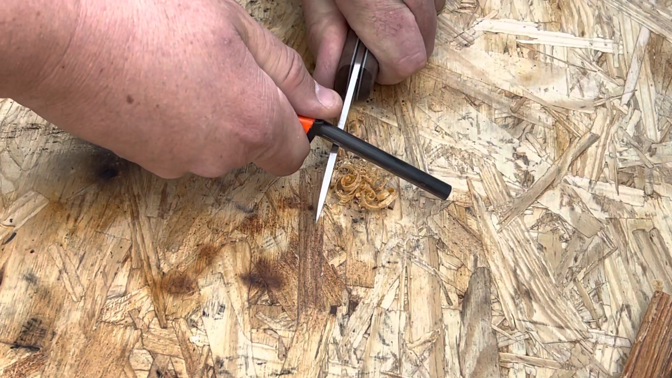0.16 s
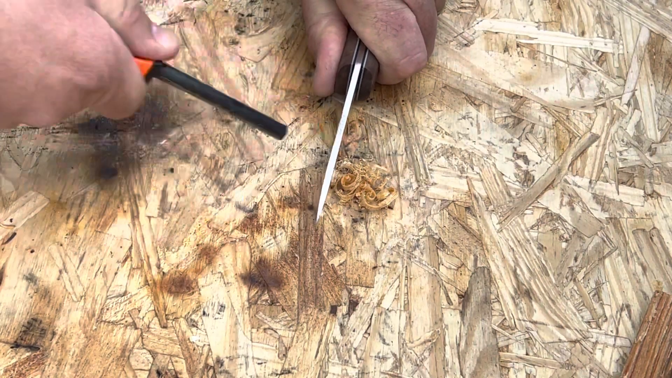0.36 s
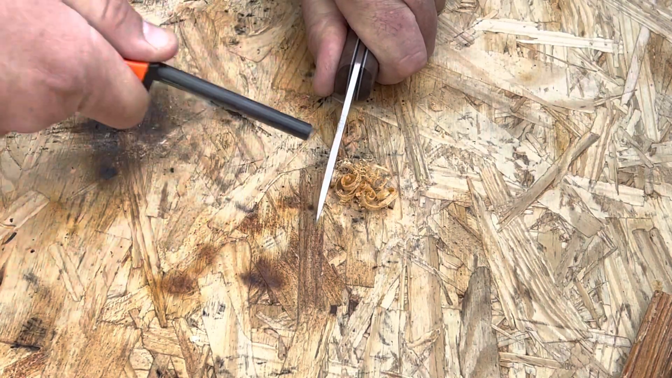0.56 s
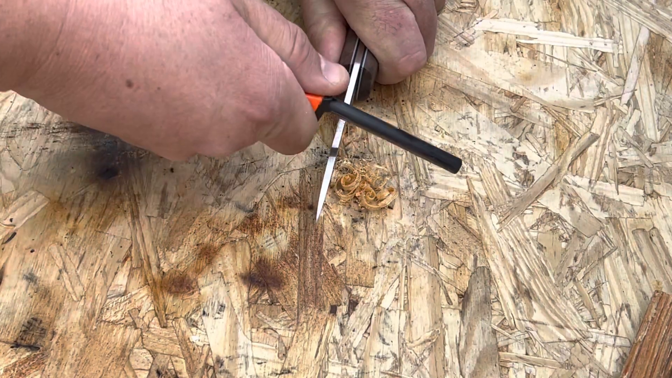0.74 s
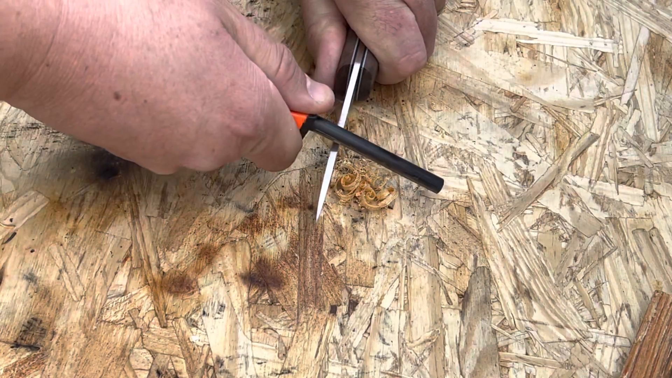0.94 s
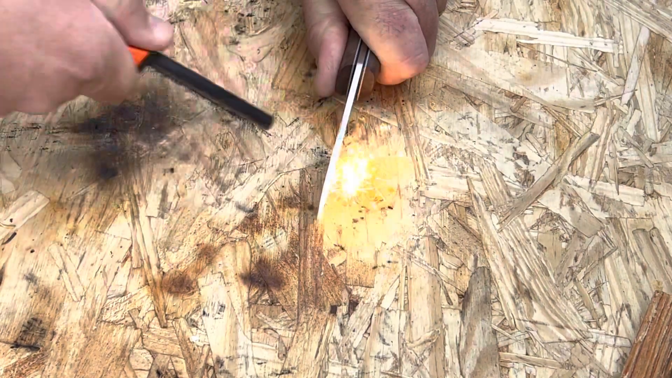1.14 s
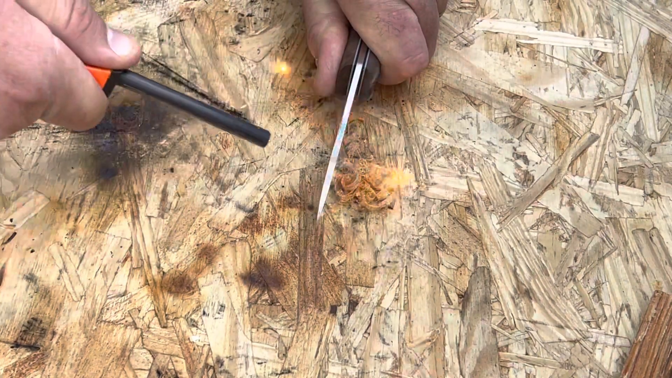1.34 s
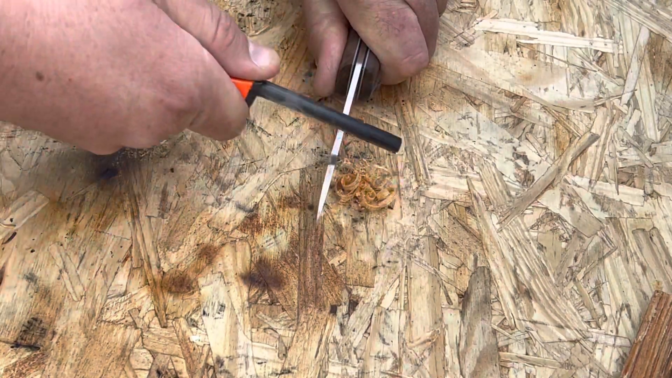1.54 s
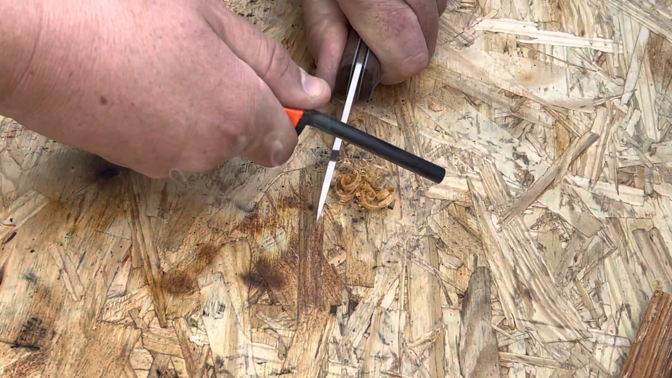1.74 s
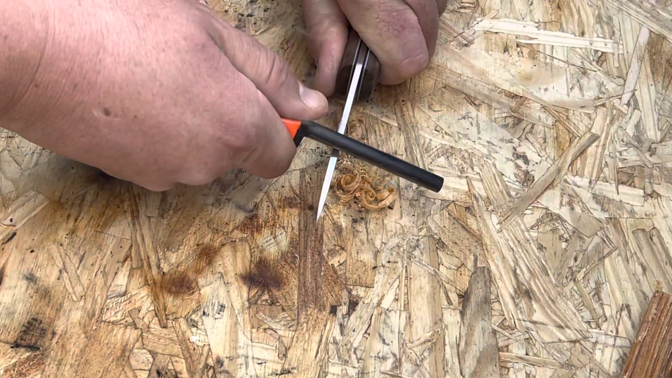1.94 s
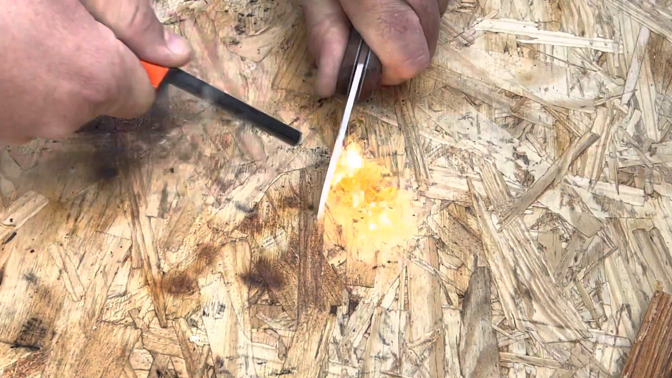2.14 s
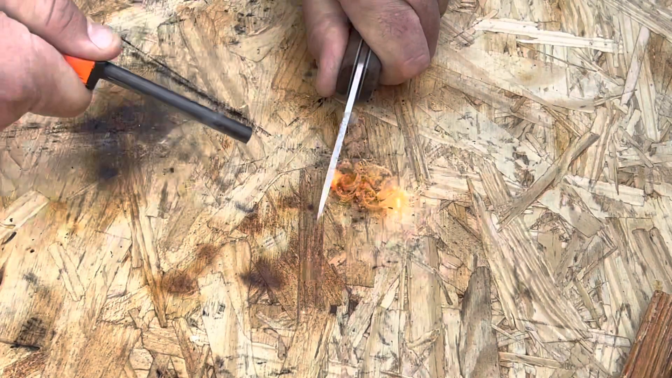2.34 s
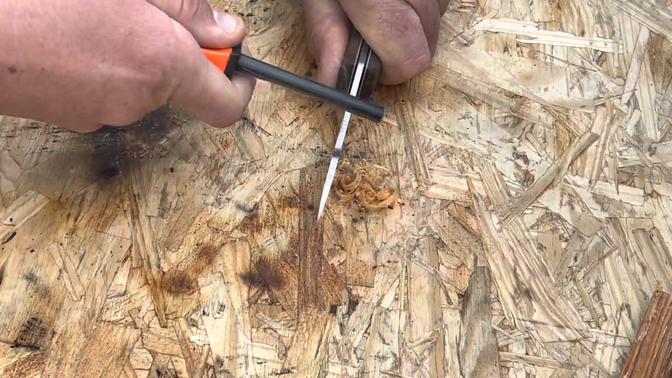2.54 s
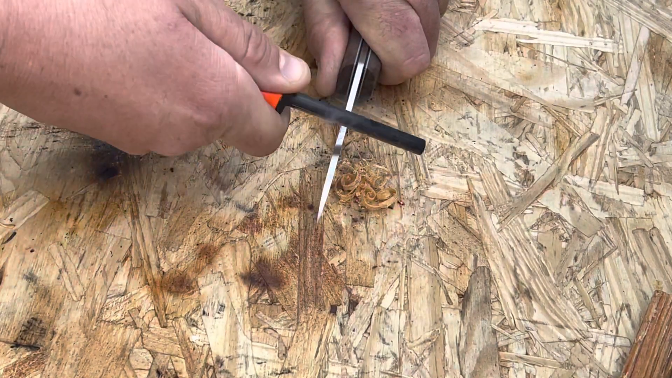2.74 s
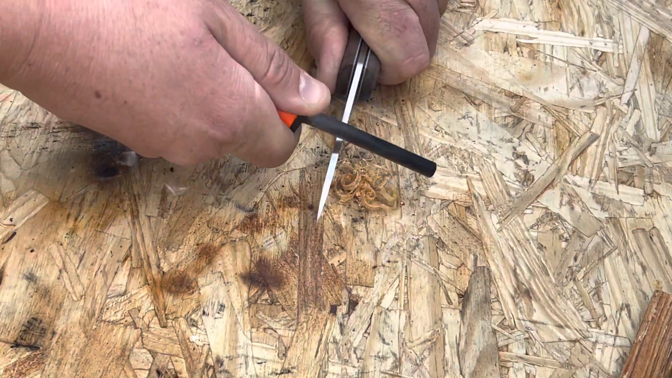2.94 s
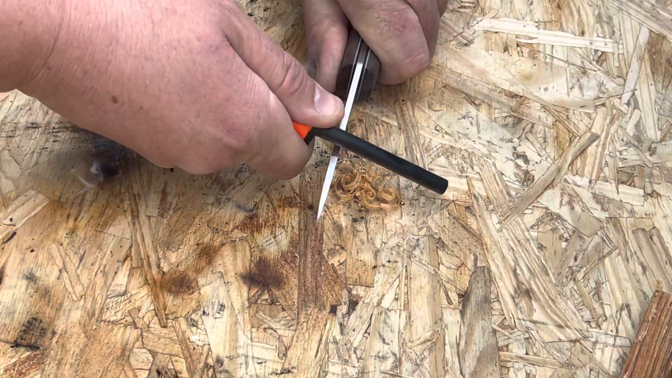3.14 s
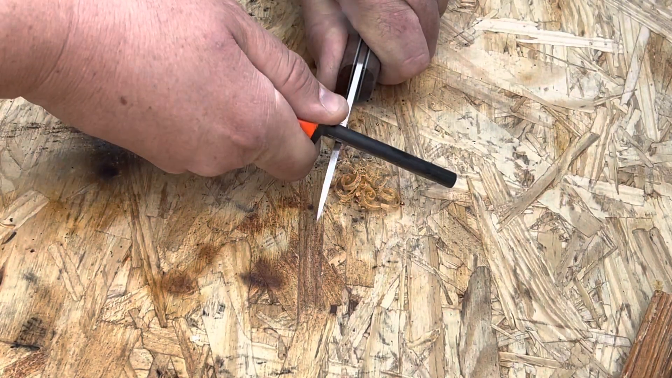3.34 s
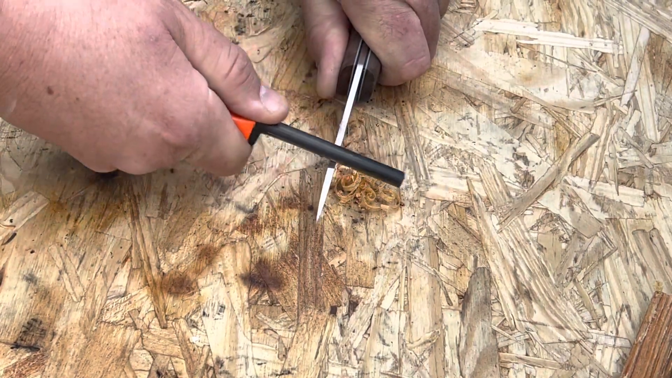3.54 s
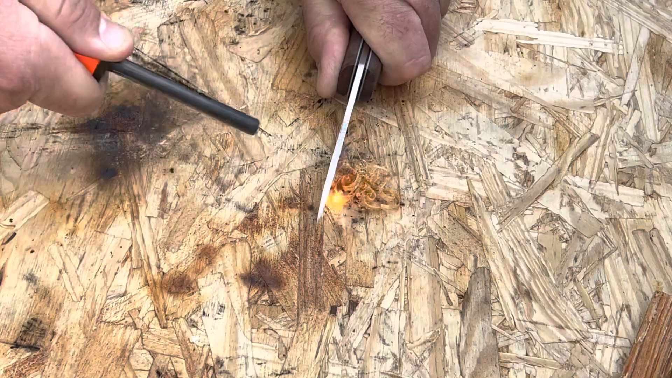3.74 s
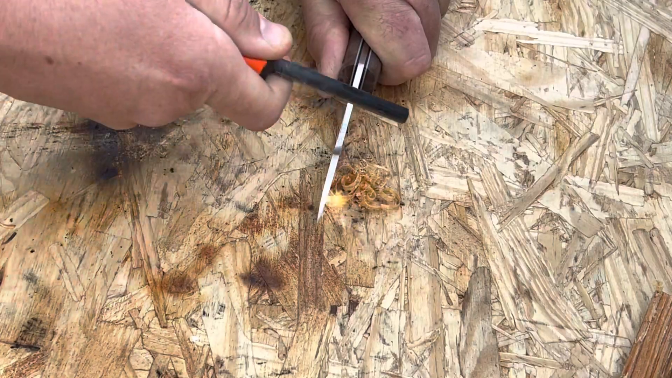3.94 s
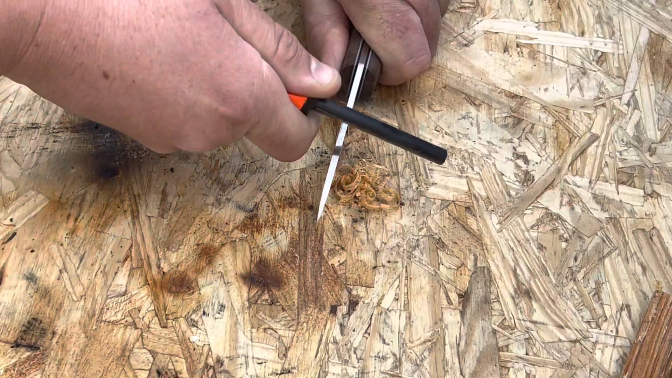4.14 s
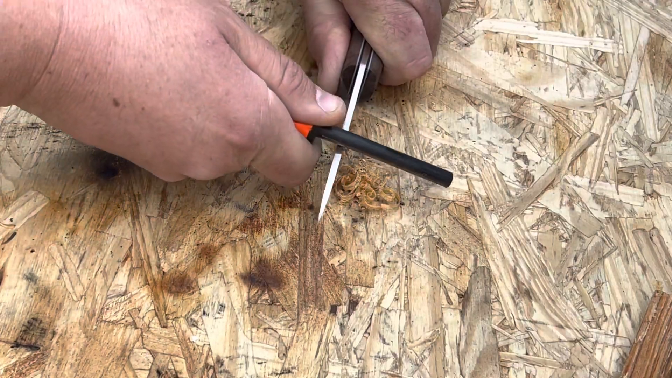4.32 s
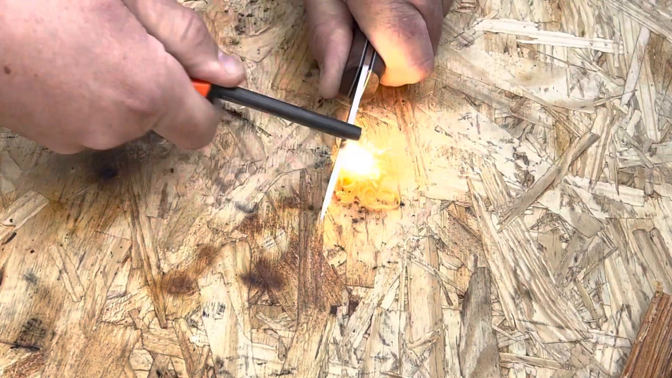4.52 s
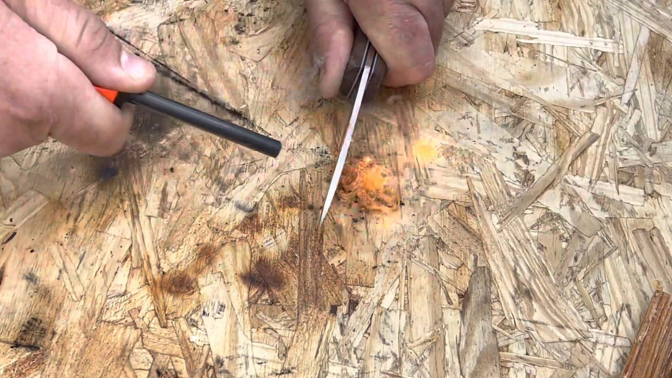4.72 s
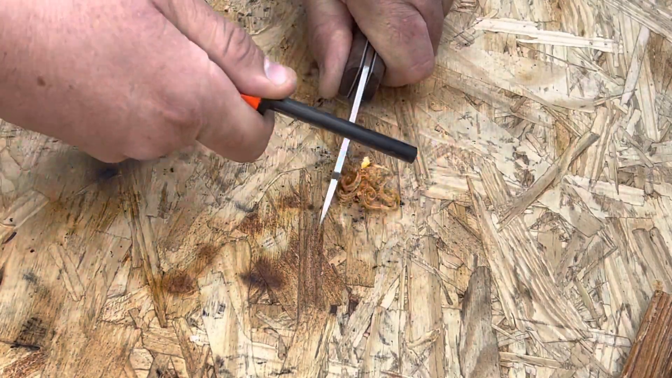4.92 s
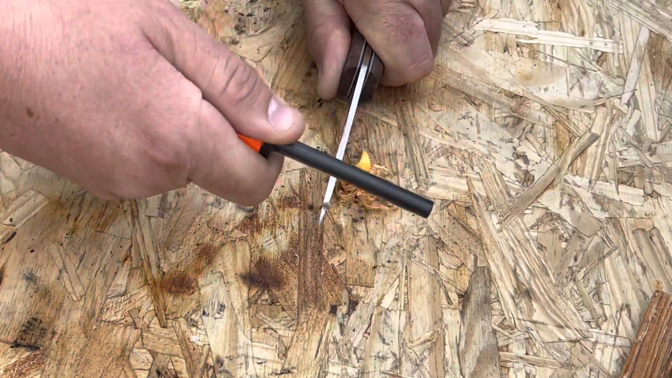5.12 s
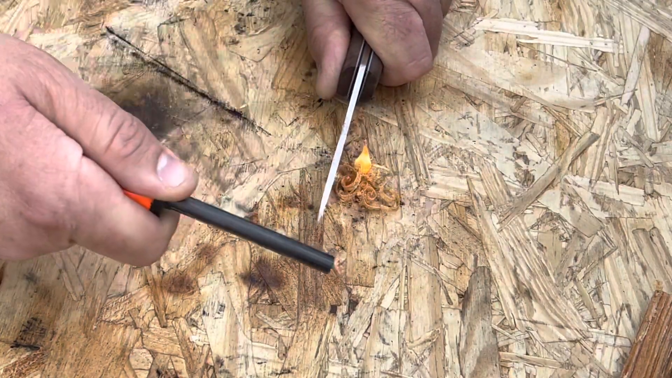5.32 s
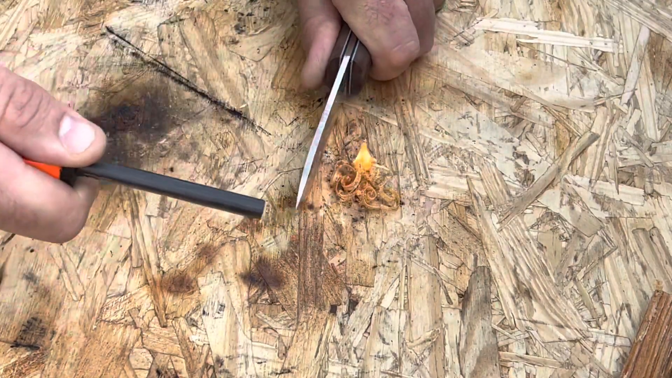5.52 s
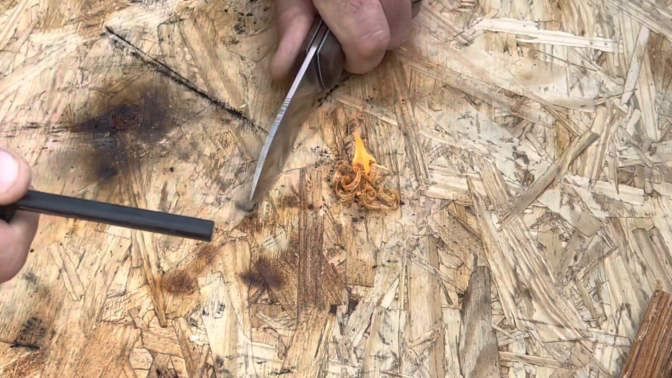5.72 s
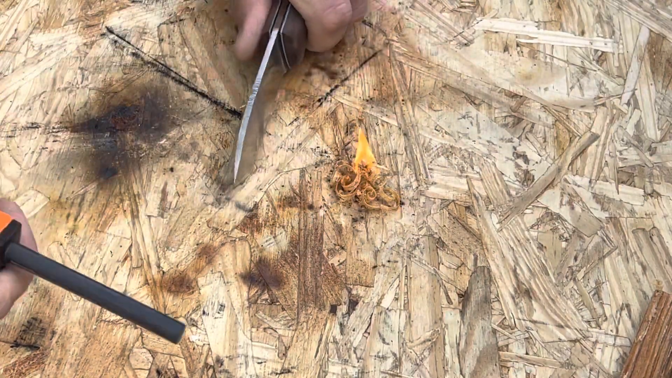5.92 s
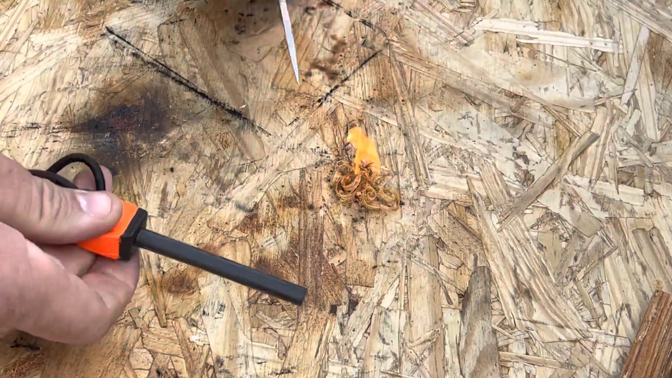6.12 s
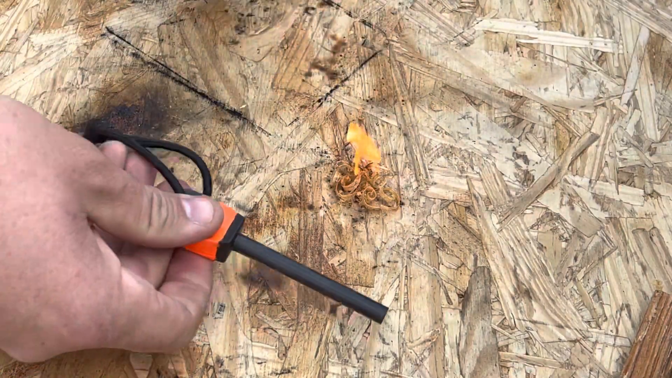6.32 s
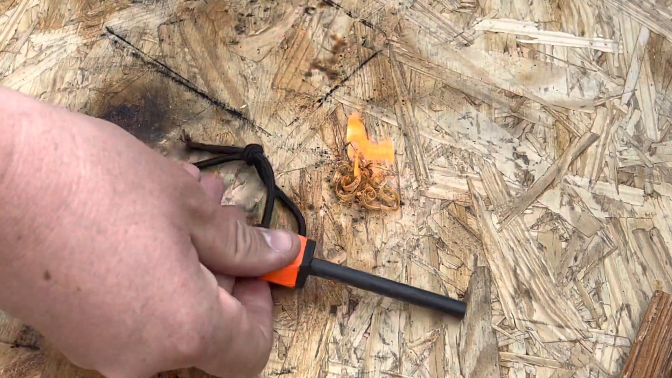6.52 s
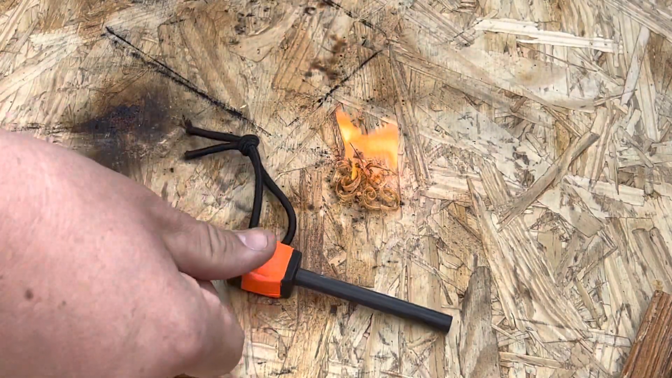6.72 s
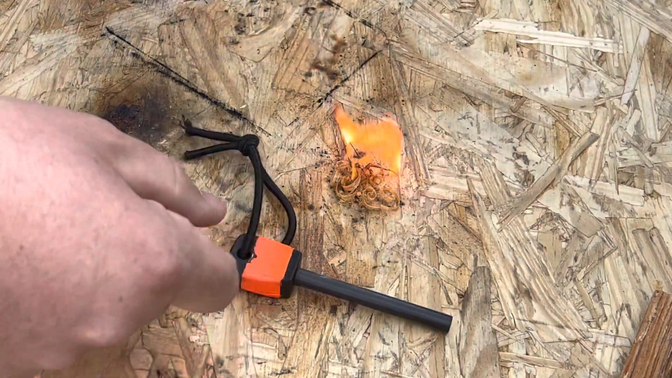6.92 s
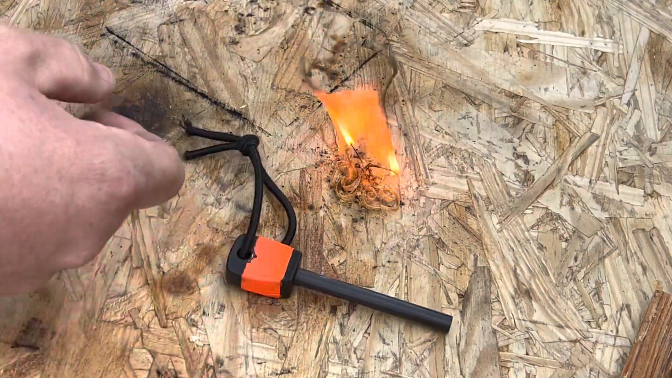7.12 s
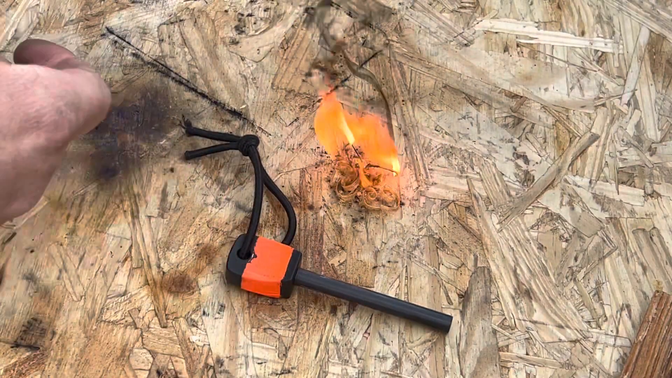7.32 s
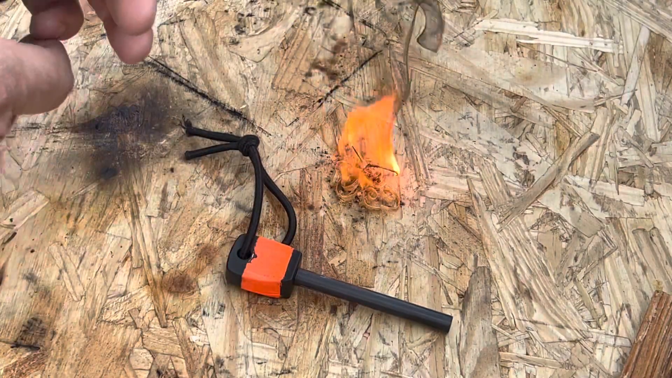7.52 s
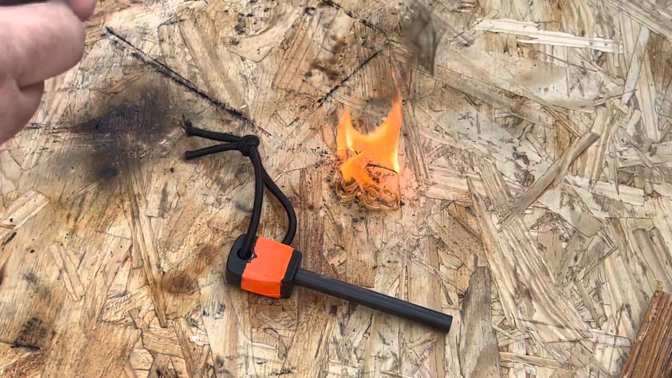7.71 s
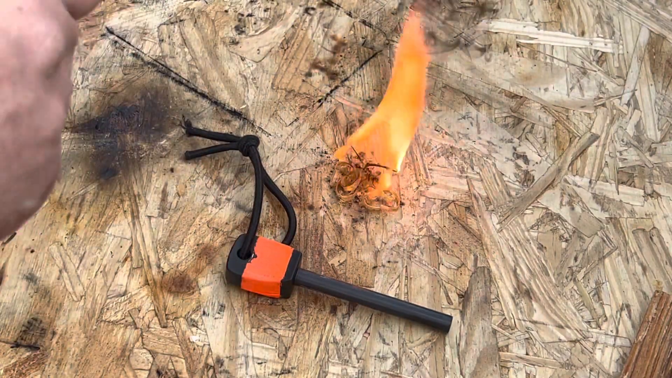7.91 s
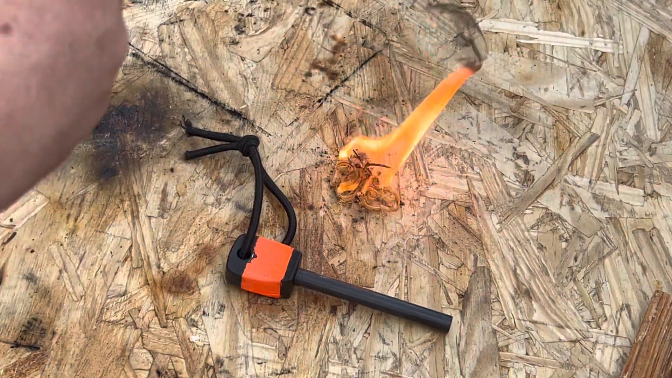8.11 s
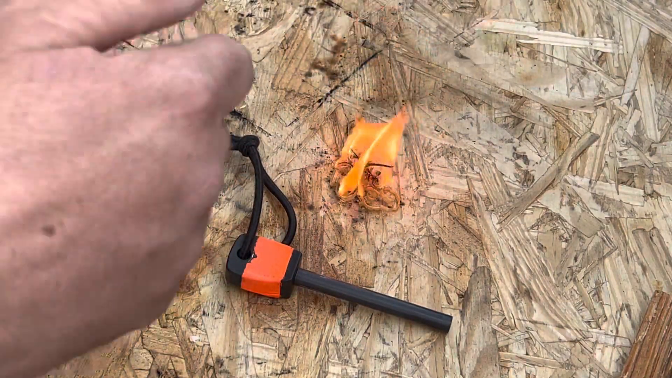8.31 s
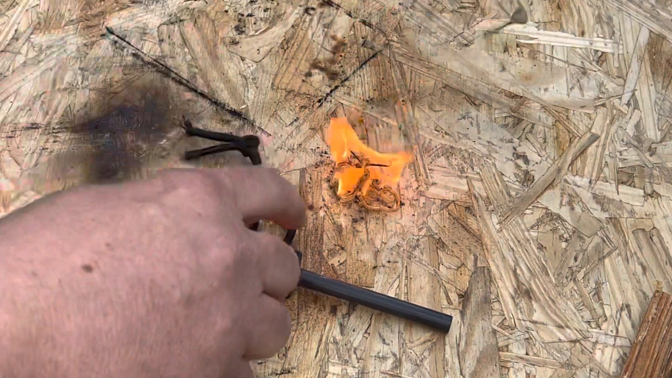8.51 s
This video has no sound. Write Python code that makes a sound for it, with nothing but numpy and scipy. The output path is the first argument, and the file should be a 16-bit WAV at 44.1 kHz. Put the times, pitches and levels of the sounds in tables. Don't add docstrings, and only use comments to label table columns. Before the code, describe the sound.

Close outdoor spark-rod strikes: short gritty steel scrapes, sizzling spits and small taps, tools clacking down on wood, then tiny crackling fire.

```python
import sys
import numpy as np
from scipy import signal
from scipy.fft import rfft, irfft, next_fast_len
from scipy.io import wavfile

SR = 44100
rng = np.random.default_rng(int(sys.argv[2]) if len(sys.argv) > 2 else 0)


def dump(signal):
    limited = np.clip(np.atleast_2d(signal).T, -1, 1)
    pcm = np.round(limited * 32767).astype(np.int16)
    wavfile.write(sys.argv[1], SR, pcm)


def to_linear_factor(level_db):
    exponent = np.asarray(level_db, float) / 20
    return 10 ** exponent


N = 377496


def rms_one(x):
    return x / np.sqrt(np.mean(x ** 2) + 1e-20)


def band(x, low_hz, high_hz, order=3):
    return signal.sosfilt(signal.butter(order, [low_hz, high_hz], "band", fs=SR, output="sos"), x)


def in_time(rows, quiet_db=-110):
    s, *columns = np.transpose(rows)
    return [to_linear_factor(np.interp(np.arange(N) / SR, s, c, quiet_db, quiet_db)) for c in columns]


def at_hz(points, hz):
    table = np.array(points)
    return np.interp(np.log(hz), np.log(table[:, 0]), table[:, 1])


def drift(rate_hz):
    r = np.exp(-2 * np.pi * 20 * rate_hz / SR)
    slow = signal.lfilter([1], [1, -2 * r, r * r], rng.standard_normal(N // 20 + 3002))[3000:]
    return np.interp(np.arange(N) / 20, np.arange(len(slow)), rms_one(slow))


def ring(clicks, hz, t60):
    r = to_linear_factor(-60 / (max(t60, .001) * SR))
    w = 2 * np.pi * hz / SR
    return signal.lfilter([0, np.sin(w)], [1, -2 * r * np.cos(w), r * r], clicks + 1e-18)


def bands(low_hz, high_hz):
    edges = 24 * 2 ** np.arange(0, 9.7, .5)
    return [(np.sqrt(a * b), signal.butter(2, [a, b], "band", fs=SR, output="sos"))
            for a, b in zip(edges, edges[1:]) if low_hz < a < high_hz]


def coloured(source, colour, patchy_db, rate_hz, low_hz, high_hz):
    out = 0
    for k, (hz, sos) in enumerate(bands(low_hz, high_hz)):
        gain = to_linear_factor(at_hz(colour, hz) + patchy_db * drift(rate_hz))
        out = out + gain * signal.sosfilt(sos, source[k % 2])
    return rms_one(out)


def grains(per_s, spread_db, shape=N):
    sizes = to_linear_factor(spread_db * np.minimum(rng.exponential(1, shape), 4)) * rng.choice([-1, 1], shape)
    return rms_one(sizes * (rng.random(shape) < per_s / SR))


def chatter(modes, gain, per_s, spread_db, wander_db=0):
    slips = grains(per_s, spread_db, (2, N)) * gain
    driven, steady_power = 0, 0
    for k, (hz, db, t60) in enumerate(modes):
        contact = to_linear_factor(wander_db * drift(34)) if wander_db else 1
        driven = driven + to_linear_factor(db) * (-1) ** (k // 2) * ring(slips[k % 2] * contact, hz, t60)
        steady_power += to_linear_factor(2 * db) * t60 * SR / (4 * np.log(1000))
    return driven / np.sqrt(steady_power)


def swells(start, rise, hold, fade, db):
    swell_db, fade_db = 19, 38.5
    out = np.zeros(N)
    for s, up, held, down, top in np.broadcast(start, rise, hold, fade, db):
        end_db = top - 30 * held
        corners = s + np.cumsum([0, up, held, 2 * down])
        span = np.arange(round(s * SR), min(round(corners[-1] * SR), N))
        out[span] += to_linear_factor(np.interp(span / SR, corners, [top - swell_db, top, end_db, end_db - 2 * fade_db]))
    return out


def bursts(events):
    out, age = np.zeros(N), np.arange(SR // 20) / SR
    for s, peak_db in events:
        t60 = np.interp(peak_db, [-50, -25], [.008, .03])
        out[round(s * SR):][:len(age)] += to_linear_factor(peak_db - 2.5 - 60 * age / t60)
    return out


def spit_noise():
    return rms_one(band(grains(9200, 3.5), 440, 10000, order=1))


# frequency in Hz, level in dB.
AIR_COLOUR = [(24, -35.5), (40, -11.5), (123, -1), (211, -5.5), (312, -9.5), (772, -15), (3080, -30.5),
              (3660, -34), (4740, -44.5), (7000, -45.5), (9100, -60), (15400, -120)]
# frequency in Hz, likeness from 0 to 1.
AIR_LIKENESS = [(60, 0.97), (200, 0.61), (400, 0.15), (700, 0.3), (1300, .35), (2000, 1), (16000, 0.71)]
# frequency in Hz, width in Hz, level in dB.
DISTANT_HUMS = [(56.5, 20, -59.5), (113.7, 23, -58.5), (155.4, 13, -63), (263, 13, -71), (340, 42, -73)]


def open_air():
    white = rng.standard_normal((2, 2, N))
    out = 0
    for k, (hz, sos) in enumerate(bands(20, 16000)):
        alike = np.clip(at_hz(AIR_LIKENESS, hz), 0, 1)
        shares = np.sqrt([[1 + alike], [1 - alike]])
        gain = to_linear_factor(at_hz(AIR_COLOUR, min(hz, 7000)) + 1.4 * drift(1.9))
        out = out + gain * shares * signal.sosfilt(sos, white[k % 2])
    out = out * to_linear_factor(-53 - 8.5) / np.sqrt(np.mean(out[0] ** 2))
    for hz, width_hz, db in DISTANT_HUMS:
        hum = rms_one(ring(rng.standard_normal(N), hz, 2.9 / width_hz))
        out[0] += to_linear_factor(db + 2.5 * drift(4.7)) * hum
    return out


# time in seconds, level in dB.
FLAME_HISS = [(7.22, -83), (7.25, -70), (7.33, -78), (7.42, -70), (7.47, -79), (7.52, -72), (7.56, -84.5),
              (7.6, -69.5), (7.66, -78), (7.72, -68), (7.82, -73), (7.89, -69.5), (8.018, -76),
              (8.13, -90.5), (8.19, -74.5), (8.3, -79), (8.414, -70), (8.56, -77)]


def flame():
    return in_time(FLAME_HISS)[0]


def crackle():
    cracks = rms_one(band(grains(30, 4.0), 350, 3500, order=2))
    return to_linear_factor(-2) * flame() * cracks


# time in seconds, peak in dB.
WOOD_TICKS = [(5.61, -56.5), (6.189, -57), (6.35, -53), (6.409, -49), (6.906, -45), (7.064, -49),
              (7.2018, -51.5), (7.236, -61.5), (7.29, -49), (7.3617, -51), (7.51, -67), (7.608, -49),
              (7.7083, -49.5), (7.768, -47), (8.1708, -52.5), (8.4556, -51)]


def wood_ticks():
    return bursts(WOOD_TICKS) * rms_one(band(spit_noise(), 400, 4900, order=1))


# start in seconds, rise in
# seconds, time to fade in seconds, rustle in dB, hiss in dB.
BRUSHES = [(.528, 0.052, 0.31, -64, -55.5), (.6, 0.15, 0.042, -70, -65), (1.406, 0.057, 1, -70, -63.5),
           (1.82, 0.16, 1, -73.5, -78), (5.09, 0.034, 0.052, -69, -95), (2.29, .01, 0.5, -67, -56),
           (2.509, 0.056, 0.44, -70.5, -91), (3.817, 0.021, 0.17, -69, -56), (3.88, 0.09, 0.1, -78, -59),
           (3.9, .14, 0.037, -66.5, -68), (3.78, 0.27, 0.049, -82, -82), (4.68, 0.094, 0.071, -57, -65.5),
           (4.811, 0.18, 0.071, -65.5, -64), (5.37, 0.17, 0.025, -72, -65), (5.72, 0.12, 0.096, -68, -82),
           (5.969, 0.13, 0.27, -59, -62.5), (6.181, 0.0084, 0.26, -61.5, -69),
           (6.92, 0.038, 0.29, -58, -62)]


def brushes(column):
    s, rise, fade, *db = np.transpose(BRUSHES)
    return swells(s, rise, 0, fade, db[column])


# start in
# seconds, rise in seconds, time to fade in seconds, low rub in dB, scuff in dB.
HAND_RUBS = [(.4, 0.025, 0.31, -43, -40), (.55, 0.011, 0.48, -48, -36), (1.28, 0.013, 0.26, -57, -59),
             (2.279, 0.0077, 0.19, -54, -50), (2.51, 0.031, 0.13, -58, -75),
             (3.72, 0.0078, 0.65, -54.5, -56.5), (4.66, 0.097, 0.075, -51.5, -48.5),
             (5.3, 0.18, 0.17, -55.5, -63.5), (5.721, 0.091, 0.35, -61, -57.5),
             (5.9, 0.18, 0.31, -52.5, -61), (6.01, .03, 0.28, -71.5, -57), (6.15, 0.059, 0.53, -57, -68),
             (6.29, 0.041, 0.25, -67, -54), (6.86, 0.031, 0.4, -56, -59.5), (7.1, 0.17, 2.7, -53, -70.5),
             (8.07, 0.23, 0.11, -74, -69), (8.363, 0.055, 0.54, -58.5, -72)]
# frequency in Hz, level in dB, t60 in seconds.
RUBBED_BOARD = [(260, 5.5, 0.016), (321, -3.5, 0.071), (427, 4, 0.088), (581, 5.5, 0.066), (670, -7, 0.051),
                (950, -2, 0.038)]
# frequency in Hz, level in dB per Hz.
RUSTLE_COLOUR = [(600, 7), (1000, 4), (2000, 5), (3500, -5), (6000, -15.5)]


def hands():
    s, rise, fade, rub_db, scuff_db = np.transpose(HAND_RUBS)
    rustle = brushes(column=0) + to_linear_factor(-4) * flame()
    rub = swells(s, rise, 0, fade, rub_db)
    scuff = swells(s, rise, 0, 0.29 * fade, scuff_db)
    rustling = coloured(grains(4400, 2.4, (2, N)), RUSTLE_COLOUR, 2.6, 6.8, low_hz=700, high_hz=6000)
    hum = chatter(RUBBED_BOARD[:2], rub, 680, 5.7) + chatter(RUBBED_BOARD[2:], scuff, 820, 6.8)
    return to_linear_factor(5.0) * rustle * rustling + band(hum, 120, 1100)


# frequency in Hz, level in dB, t60 in seconds.
BOARD_MODES = [(208, -10, 0.22), (334, -4, 0.1), (445, -12, 0.1), (553, -3, 0.15), (668, -9, .1),
               (755, -9.5, 0.09), (895, 1, 0.07), (1007, -3, 0.075), (1128, -8, 0.06), (1195, 1.5, 0.08)]


def blows(events, bright_modes, tail, thud, rattle_s, ring_db, crack_db, tail_db, snap, count, touch_s, size):
    s, peak_db, bright_db, low_db = np.transpose(events)
    crack_level = bright_db + crack_db
    shape = (len(s), count)
    later = (rattle_s * SR * rng.random(shape) * (np.arange(count) > 0)).astype(int)
    luck = rng.normal(0, 2.5, (len(s), 24))
    signs = np.where(later > 0, rng.choice([-1., 1.], shape), 1)
    contacts = np.zeros((len(s), size))
    np.put_along_axis(contacts, later, signs * 0.82 ** np.arange(count), axis=1)

    def clicks(db):
        return contacts * to_linear_factor(peak_db + db)[:, None]

    thud_hz, thud_db, thud_t60 = thud
    out = ring(clicks(thud_db), thud_hz, thud_t60)
    for k, (hz, db, t60) in enumerate(BOARD_MODES):
        mode_db = db + ring_db + luck[:, k] + (low_db + 29.5) * (hz < 300)
        out -= (-1) ** k * ring(clicks(mode_db), hz, t60)
    touch = np.hanning(round(touch_s * SR) + 3)
    out = signal.lfilter(touch / touch.sum(), 1, band(out, 190, 2900, order=2))
    out = out + band(ring(clicks(low_db - 7.5), 68, 0.39), 40, 120, order=1)

    bright = ring(clicks(crack_level), 3500, 0.019)
    for k, (hz, db, t60) in enumerate(bright_modes):
        bright += (-1) ** k * ring(clicks(db + crack_level - 8.0 + luck[:, -k - 1]), hz, t60)
    out += band(bright, 1300, 6600, order=2)
    out += band(clicks(crack_level - 12.5), 4000, 15000, order=1)

    white = rng.standard_normal((len(s), 2, size))
    age = np.arange(size) / SR
    snap_db, snap_t60, snap_hz = snap
    snap_gain = to_linear_factor((peak_db + bright_db + snap_db)[:, None] - 60 * age / snap_t60)
    out += band(white[:, 0, ::-1] * snap_gain, 2000, snap_hz, order=2)
    for k, (hz, sos) in enumerate(bands(150, 9000)):
        level_db = tail_db + at_hz(tail, hz) + (bright_db + 12.5) * (hz > 1800)
        t60 = at_hz(np.array(tail)[:, ::2], hz)
        dying = to_linear_factor((peak_db + level_db)[:, None] - 60 * age / t60)
        out += dying * signal.sosfilt(sos, signal.sosfilt(sos, white[:, k % 2]))

    placed = np.zeros(N + size)
    for start, sound in zip(np.round((s + 0.0006) * SR).astype(int), out):
        placed[start:start + size] += sound * np.linspace(1, 0, size)
    return placed[:N]


# time in seconds, peak in dB, crack in dB re peak, low ring in dB re peak.
LAID_DOWN = [
    (6.442, -13, -21.5, -24),
    (6.62, -10, -15.5, -52.5),
    (6.701, -9, -19.5, -29.5),
]
# frequency in Hz, level in dB, t60 in seconds.
KNIFE_MODES = [(1200, 4, 0.039), (1690, 10, 0.028), (2160, 4.5, 0.025), (2560, 13.5, 0.02),
               (2920, 4, 0.017), (3280, -5, 0.02), (4398, -9, 0.012), (5184, 1, 0.012)]
# frequency in Hz, level in dB, t60 in seconds.
HANDLE_MODES = [(1086, 17, .04), (1350, 12, 0.035), (1540, 13, 0.018), (1707, 10.5, 0.028), (2020, 9, 0.02),
                (2290, 5.5, 0.027), (2530, 10.5, 0.02), (3040, 2, 0.017), (3180, -20, .02),
                (3900, -8, 0.015), (4600, -18, 0.015), (5250, -1.5, 0.015)]
# frequency in Hz, level in dB, t60 in seconds.
LAID_TAIL = [(150, 12, 0.25), (304, -5.5, 0.37), (920, -6, 0.24), (1440, -8, 0.16), (2860, -13.5, 0.27),
             (4170, -38.5, 0.61), (8800, -37, 0.17)]


def laid_down():
    out = 0
    for rows, modes, snap in ((LAID_DOWN[:1], KNIFE_MODES, (4.0, .03, 5000)),
                              (LAID_DOWN[1:], HANDLE_MODES, (1.0, .035, 7000))):
        out = out + blows(rows, modes, LAID_TAIL, (700, -1.5, .012), .005, ring_db=-28.0, crack_db=1.5,
                          tail_db=2.5, snap=snap, count=4, touch_s=.0003, size=SR // 3)
    return out


# time in seconds, peak in
# dB, crack in dB re peak, low ring in dB re peak.
TAPS = [(0.12, -40.5, -17, -1), (0.135, -34, -21, -6), (0.561, -51, -25, 0), (0.6, -54, -25, 18.5),
        (0.869, -20.5, -15, -18), (1.822, -13, -13, -24), (2.539, -45, -27, -3), (2.759, -52, -30, 1),
        (3.205, -16, -23, -14.5), (3.31, -40, -25, 3.5), (4.143, -44.5, -27, 2), (4.23, -39.5, -44, -3.5),
        (4.266, -19, -23, -17.5), (4.319, -34.5, -24.5, -16), (4.358, -39.5, -26, -0.5),
        (5.116, -56, -14.5, 5), (5.454, -42, -21, -6.5), (5.79, -54, -25, -9), (5.825, -49.5, -26.5, -10.5),
        (6.045, -48.5, -25, -12), (6.07, -47.5, -25, -14), (6.325, -49, -25, -12), (6.188, -48, -27, -7),
        (6.545, -39.5, -30, -5), (6.718, -37, -23, -16), (6.731, -23.5, -21.5, -28), (6.744, -36, -26, -8),
        (7.256, -57, -30, 10)]
# frequency in Hz, level in dB, t60 in seconds.
TAPPED_BLADE = [(1916, -14, .04), (2200, -15, .05), (2590, -5, .07), (3010, -4, .06), (3270, -3, .05),
                (3590, -8, .06), (3700, -6, .06), (3890, -15, .04), (4045, -20, .04), (4590, -24, .03),
                (5200, -22, .015), (6650, -24, .03), (8200, -22, .04)]
# frequency in Hz, level in dB, t60 in seconds.
TAP_TAIL = [(150, -3, 0.83), (313, 12.5, 0.13), (1140, -2.5, 0.18), (1600, -27.5, 0.2), (2173, -19.5, 0.13),
            (2980, -6.5, 0.18), (3590, -14, .18), (4300, -35.5, 0.1), (9100, -35, 0.066)]


def taps():
    return blows(TAPS, TAPPED_BLADE, TAP_TAIL, (820, 11, .009), 0, ring_db=-17.0, crack_db=3.0, tail_db=1.0,
                 snap=(5.0, .045, 3600), count=1, touch_s=.0009, size=SR // 3)


# time in seconds, peak in dB, crack in dB re peak, low ring in dB re peak.
CATCHES = [(0.209, -34, -14, -25), (0.256, -37, -2, -7), (0.271, -30, -21, -4), (0.311, -16.5, -21, -16),
           (1.069, -24.5, -16.5, -25.5), (1.1, -10, -17, -33.5), (2.139, -11, -10.5, -20.5),
           (3.443, -40.5, -6, -24.5), (3.461, -39, 11, -14.5), (3.481, -31.5, 4, -20),
           (3.515, -22.5, -21.5, -13), (3.585, -15, -9, -33), (4.52, -17.5, -11.5, -26),
           (4.562, -20.5, -5, -29), (0.286, -19.5, -21, -7), (0.338, -14, -4, -16), (0.359, -14, -4, -46),
           (1.087, -13, -23.5, -31.5), (1.11, -8, -8, -36.5), (1.119, -13, -13, -34.5),
           (1.132, -14.5, -0.5, -22.5), (2.093, -9, -10.5, -35), (2.111, -11.5, -2, -26),
           (2.123, -15.5, -7.5, -29.5), (2.155, -17, -7.5, -17), (3.535, -12.5, -8.5, -24.5),
           (3.557, -17, -22, -39.5), (3.616, -20.5, 0.5, -2.5), (4.486, -19.5, -23, -32),
           (4.508, -7.5, -17, -35.5), (4.531, -9.5, -4, -40), (4.543, -12.5, -4, -27.5)]
# frequency in Hz, level in dB, t60 in seconds.
STEEL_MODES = [(1684, -4.5, 0.017), (2160, 0, 0.012), (2625, -4.5, 0.02), (3050, 2, 0.022),
               (3190, -2.5, 0.032), (3440, 0.5, 0.028), (3687, -1, 0.018), (4430, -5, 0.012),
               (5200, -5.5, 0.012), (5900, -12, 0.0027)]
# frequency in Hz, level in dB, t60 in seconds.
CATCH_TAIL = [(151, -0.5, 1), (320, 4, 0.092), (1180, 3.5, 0.15), (1520, -19.5, 0.27), (2210, -14.5, 0.093),
              (3050, -2.5, 0.026), (4380, -24, 0.032), (9280, -39, 0.029)]


def catches():
    return blows(CATCHES, STEEL_MODES, CATCH_TAIL, (980, 2.5, .016), 0.0027, ring_db=-17.5, crack_db=-7.0,
                 tail_db=-1.5, snap=(-9.0, .02, 7000), count=2, touch_s=0.0005, size=SR // 6)


# start in seconds, rise in seconds, burn in seconds, fizz in dB, time to fade in seconds.
SHOWERS = [
    (.215, 0.046, 0.11, -45.5, 0.24),
    (1.049, 0.054, 0.16, -36.5, 0.11),
    (2.048, 0.0053, 0.03, -48.5, 0.074),
    (2.049, 0.11, 0.028, -35.5, 0.35),
    (3.42, 0.14, 0.11, -35.5, 0.14),
    (4.462, 0.11, 0.011, -33, 0.24),
    (5.456, 0.034, 0.0059, -45.5, 0.12),
]
# time in seconds, peak in dB.
METAL_SPITS = [(0.1313, -46.5), (0.3595, -26), (1.1328, -25), (1.2059, -27), (1.2417, -25), (1.258, -27.5),
               (1.3242, -43.5), (1.481, -42.5), (2.2686, -28.5), (2.3475, -34), (2.356, -32), (2.399, -35),
               (2.418, -35.5), (2.5417, -44.5), (3.4614, -42.5), (3.481, -41), (3.495, -46), (3.535, -33.5),
               (3.545, -40), (3.619, -33.5), (3.634, -35), (4.654, -38.5), (3.8386, -38.5), (3.9522, -39),
               (4.646, -41), (4.73, -52.5), (4.742, -41), (4.751, -31.5), (4.7599, -32), (4.771, -41.5),
               (4.322, -60), (4.36, -60), (4.232, -61), (5.456, -41), (5.4844, -29), (5.4915, -29.5)]
# frequency in Hz, level in dB per Hz.
FIZZ_COLOUR = [(600, 0), (1500, -5.5), (3000, -1.5), (5000, -3.5), (7000, 1), (9000, -5), (11000, -1.5),
               (13000, -5.5), (15500, -12.5), (18000, -20)]


def sparks():
    s, rise, burn, db, fade = np.transpose(SHOWERS)
    far_hiss = to_linear_factor(-74.5)
    fizz = swells(s, rise, burn, fade, db) + brushes(column=1) + flame() + far_hiss
    flecks = grains(9000, 4, (2, N))
    fizzing = coloured(flecks, FIZZ_COLOUR, 1.6, 7.4, low_hz=400, high_hz=16000)
    flutter_db = 2.0 * drift(60.0)
    return to_linear_factor(1.0 + flutter_db) * fizz * fizzing + bursts(METAL_SPITS) * spit_noise()


# time in seconds, peak in dB.
GRIT = [(0.2208, -35), (0.2278, -44), (0.2432, -28.5), (0.2672, -39), (0.2966, -29), (0.3605, -29.5),
        (1.0468, -43.5), (1.0598, -39), (1.0748, -31), (1.1316, -19.5), (2.0513, -33), (2.0643, -28),
        (2.0852, -26), (3.4594, -44), (3.4793, -32.5), (3.4953, -25.5), (3.5212, -31), (3.5342, -25),
        (3.5711, -32.5), (3.618, -25.5), (4.4608, -46), (4.4628, -39.5), (4.4758, -38), (4.4947, -28),
        (4.5152, -27), (4.5461, -18.5)]
# frequency in Hz, level in dB, t60 in seconds.
ROD_MODES = [(5400, -12.5, .012), (6100, -16, .02), (6700, -13.5, .02), (8700, -12.5, 0.033),
             (8310, 0, 0.05), (8800, -7, 0.014)]
# frequency in Hz, level in dB, t60 in seconds.
ROD_TOP_MODES = [(12680, 2, .04), (13150, -2, .03)]


def grit():
    rasp, age = np.zeros(N), np.arange(SR // 100) / SR
    for s, peak_db in GRIT:
        rasp[round(s * SR):][:len(age)] += to_linear_factor(peak_db - 60 * age / .012)
    scrape = rms_one(band(grains(9800, 3.0), 1500, 11000, order=2))
    return (to_linear_factor(-2.5) * chatter(ROD_MODES[1:], rasp, 9000, 1.5)
            + to_linear_factor(-10.0) * chatter(ROD_TOP_MODES, rasp, 9000, 1.5) + to_linear_factor(-14.0) * rasp * scrape)


# time in seconds, board level in dB, extra speed felt by the steel in dB.
DRAG_PRESSURE = [
    [(0.188, -35, -21), (.215, -36.5, -2), (.24, -31.5, 1), (0.268, -21, -2.5), (.3, -25, -0.5),
     (.33, -19.5, 0), (0.362, -22, 1), (0.402, -49, 1), (0.46, -58, -3)],
    [(1.033, -45.5, -6.5), (1.05, -32.5, -1.5), (1.068, -15, -2), (1.09, -16, -1.5), (1.118, -14.5, 7),
     (1.135, -19, -4.5), (1.15, -27, 4.5), (1.185, -33.5, 0), (1.24, -48, -9)],
    [(2.04, -38, -1.5), (2.052, -32, 3.5), (2.09, -25, 1.5), (2.1, -21.5, 1.5), (2.122, -19, 0),
     (2.145, -15, 7), (2.165, -30.5, 1.5), (2.2, -42.5, 6.5), (2.26, -60, -8)],
    [(3.406, -38, -7), (3.42, -36.5, -1), (3.47, -34.5, -6.5), (3.528, -23.5, 1), (3.536, -17.5, 2.5),
     (3.59, -21.5, 0), (3.625, -35, -3), (3.65, -33, -1), (3.7, -65, -2)],
    [(4.425, -60, -22), (4.455, -35, -4.5), (4.48, -30.5, 1.5), (4.505, -14, -4), (4.525, -12, -1),
     (4.55, -13.5, 9), (4.568, -35, 5), (4.59, -37, -5), (4.66, -42.5, 0)],
]
# rod sings from in seconds, rod leaves the spine in seconds,
# steel rasp in dB, rod ring in dB, bench thump in dB.
STROKES = [
    (0.24, 0.378, -30.5, -46, -39.5),
    (1.074, 1.126, -34, -49, -42),
    (2.048, 2.155, -29.5, -37, -39.5),
    (3.493, 3.62, -28.5, -40, -32),
    (4.49, 4.544, -29, -43, -38.5),
]


def drags():
    full_db, wake_s = -22.5, 0.0088
    t = np.arange(N) / SR
    board = steel = rod = top = bench = 0
    for rows, (sing, lift, steel_db, rod_db, bench_db) in zip(DRAG_PRESSURE, STROKES):
        pressure, speed = in_time(rows, -np.inf)
        share = pressure / to_linear_factor(full_db)
        awake = speed * np.clip((t - rows[0][0]) / wake_s, 0, 1) ** 2
        on_spine = awake * (np.arange(N) < lift * SR)
        rod_share = np.minimum(share, 1)
        singing = np.where(np.arange(N) < sing * SR, to_linear_factor(-24), 1)
        board = board + pressure
        steel = steel + to_linear_factor(steel_db) * awake * share ** 0.78
        rod = rod + to_linear_factor(rod_db) * on_spine * rod_share ** 0.25 * singing
        top = top + to_linear_factor(-52.5) * on_spine * rod_share ** .3
        bench = bench + to_linear_factor(bench_db) * share ** 0.52

    bite = drift(64.0)
    damped = [(hz, db, 0.62 * t60) for hz, db, t60 in BOARD_MODES]
    legs = ring(rng.standard_normal(N), 55, 0.21) + 2.3 * ring(rng.standard_normal(N), 128, 0.1)
    board = board * to_linear_factor(2.2 * bite - 5.0)
    heavy = board * np.clip(board / to_linear_factor(-35.5), 0, 1) ** .8
    wood = to_linear_factor(-0.5) * chatter(damped[:6], heavy, 1500, 4.5)
    wood = wood + to_linear_factor(-1.0) * chatter(damped[6:], board, 1200, 2.8)
    blade = chatter(STEEL_MODES, steel * to_linear_factor(1.6 * bite - 7.5), 3000, 2.6, wander_db=3.0)
    rod_ring = chatter(ROD_MODES, rod * to_linear_factor(1.9 * bite - 2.5), 4000, 1.2)
    rod_top = chatter(ROD_TOP_MODES, top * to_linear_factor(3.0 * bite), 4000, 1.5)
    return (band(wood, 230, 1600, order=4) + band(blade, 1200, 7200) + band(rod_ring, 4800, 9700)
            + band(rod_top, 11000, 15500) + band(bench * rms_one(legs), 30, 220, order=2))


# frequency in Hz, lead of the left in radians.
PORT_PHASE = [(0, 0), (900, 0), (1400, -.27), (2400, .1), (3300, .55), (4500, .35), (5200, 0), (7300, 0),
              (8300, -.95), (8700, -1.3), (9500, -2.95), (10800, -3.35), (12500, -5.8), (13400, -6.3),
              (14300, -6.4), (15500, -8.4)]
# frequency in Hz, left minus right in dB.
PORT_BALANCE = [(100, 0), (300, 1.4), (600, 1.9), (1300, 2.6), (1900, 0)]


def ports(x):
    size = next_fast_len(N + 4096)
    hz = np.arange(size // 2 + 1) * SR / size
    phase = np.interp(hz, *np.transpose(PORT_PHASE))
    turn = to_linear_factor(at_hz(PORT_BALANCE, hz + 1) / 2) * np.exp(.5j * phase)
    return irfft(rfft(x, size) * np.array([turn, 1 / turn]), size)[:, :N]


def scene():
    common, apart = open_air()
    bench = hands() + laid_down() + taps() + catches() + grit() + drags()
    close = bench + sparks() + wood_ticks() + crackle()
    apart = apart + to_linear_factor(-12) * band(np.roll(bench, 130), 450, 1800, order=2)
    apart = apart + to_linear_factor(-21.5) * band(np.roll(bench, 400), 50, 450, order=2)
    apart = apart + to_linear_factor(-23) * band(np.roll(close, 300), 2500, 15500, order=1)
    return ports(close + common) + apart * [[1], [-1]]


def low_pass(x):
    return signal.sosfilt(signal.butter(12, 16250, fs=SR, output="sos"), x)


def record(dry):
    x = signal.sosfilt(signal.butter(6, 46, "high", fs=SR, output="sos"), dry)
    x = .95 * np.tanh(x / .95)
    x = signal.sosfilt(signal.cheby2(12, 70, 16500, fs=SR, output="sos"), x)
    return low_pass(x)


dry = scene()
out = record(dry)
dump(out)
```